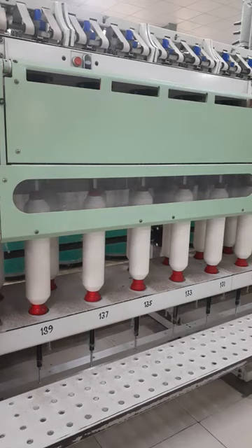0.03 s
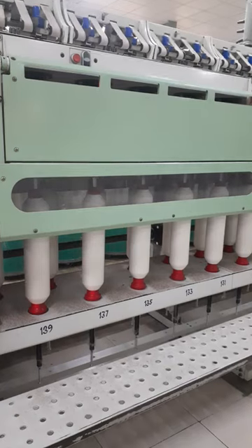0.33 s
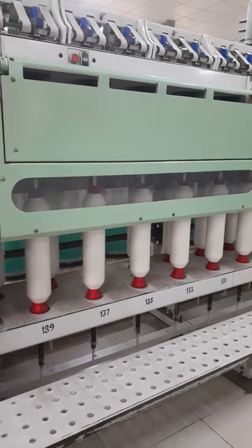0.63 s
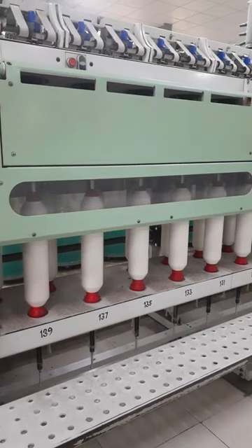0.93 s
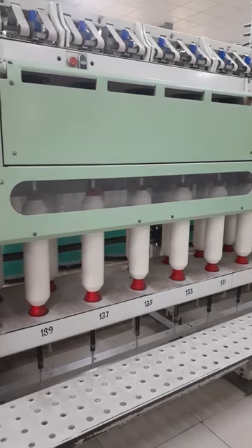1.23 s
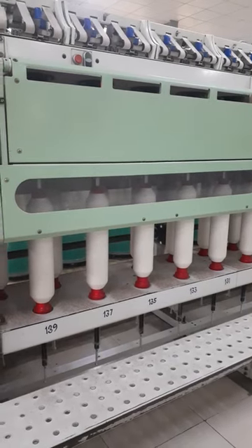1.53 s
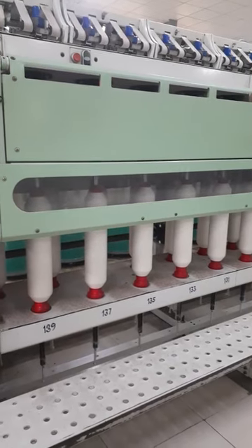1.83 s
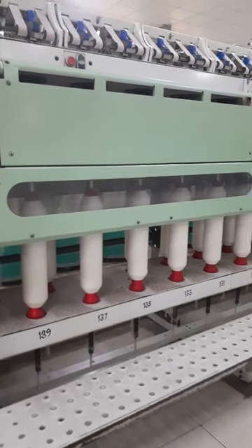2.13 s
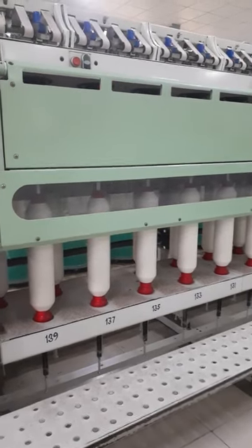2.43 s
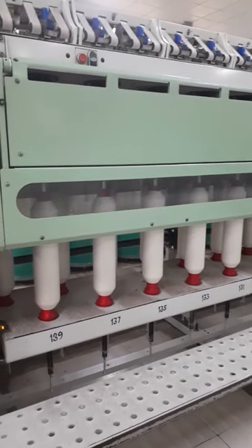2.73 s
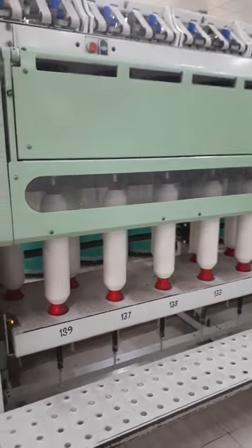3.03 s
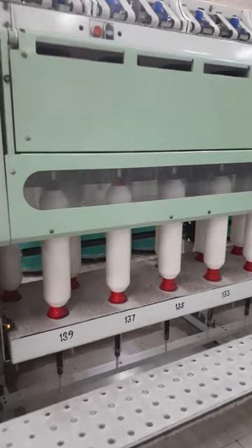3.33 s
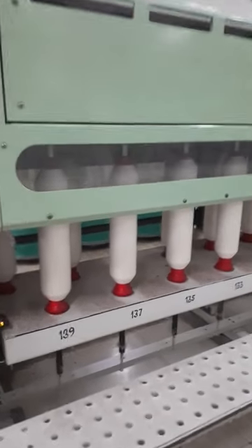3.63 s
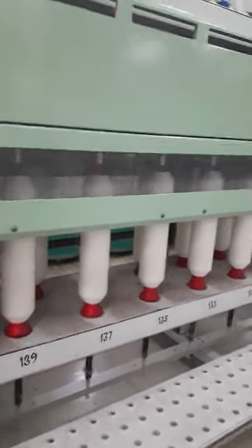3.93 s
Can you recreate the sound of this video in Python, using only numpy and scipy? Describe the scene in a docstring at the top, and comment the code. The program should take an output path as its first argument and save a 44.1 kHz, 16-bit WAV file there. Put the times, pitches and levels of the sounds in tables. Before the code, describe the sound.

A yarn spinning machine runs steadily in a large factory hall. Its spindles make a throbbing hum with a motor whine, while whirling yarn hisses close to the microphone and other machines roar farther off.

```python
"""A ring spinning frame running in a large factory hall, heard in stereo from the aisle.
Banks of spindles at slightly different speeds beat into a throbbing hum; the drives add steady tones.
Farther off, the other frames merge into the roar of the hall. Close to the microphone, whirling yarn
rushes and the travellers hiss unevenly round their rings."""
import sys
import numpy as np
from scipy import signal
from scipy.fft import rfft, irfft
from scipy.io import wavfile
from scipy.ndimage import uniform_filter1d

SR = 44100
rng = np.random.default_rng(int(sys.argv[2]) if len(sys.argv) > 2 else 0)


def bounce(signal):
    """Save signal as a 16-bit WAV file at the path given by the first command-line argument."""
    frames = np.transpose(np.atleast_2d(signal))
    limited = np.clip(frames, -1, 1)
    pcm = np.round(limited * 32767).astype(np.int16)
    wavfile.write(sys.argv[1], SR, pcm)


N = 176400
TIME, FREQ = np.arange(N) / SR, np.fft.rfftfreq(N, 1 / SR)
FLUTTER_HZ = 28  # how fast the roar, rush and hiss flicker


def undb(db):
    """Decibels to gain."""
    return 10 ** (np.asarray(db) / 20)


def curve(rows):
    """Gain over time through points of t/s, level/dB."""
    return undb(np.interp(TIME, *np.array(rows).T))


def walk(rate_hz):
    """Smooth random drift with a spread near 1."""
    hold = max(int(SR / rate_hz), 2)
    steps = np.repeat(rng.standard_normal(N // hold + 2), hold)
    return 1.3 * uniform_filter1d(uniform_filter1d(steps, hold), hold)[:N]


def pan(db):
    """Left and right gains for a level difference, left minus right."""
    return undb(np.array([[db], [-db]]) / 2)


def colour(white, hz, db):
    """Shape white noise to a spectrum in dB per Hz."""
    gain = undb(np.interp(np.log(np.maximum(FREQ, 1)), np.log(hz), db))
    return irfft(rfft(white) * gain, N) * np.sqrt(SR / 2)


def tone(hz, sway_db):
    """A wavering tone, a little to the right, that reaches the two channels by different paths."""
    spread_rad_per_khz = 1.87
    phase = 2 * np.pi * (np.cumsum(hz) / SR + rng.random())
    phase_gap = spread_rad_per_khz * np.mean(hz) / 1000 * walk(2.006)
    sway = undb(sway_db * walk(5.07))
    return np.sqrt(2) * sway * np.sin(phase + np.array([phase_gap, -phase_gap]) / 2) * pan(db=-2)


def bank(rows, level):
    """Unbalanced spindles hum at their turning rates and beat against each other."""
    # harmonics of every spindle: multiple, level/dB
    overtones = [(1, -.5), (2, -16), (3, -23.5), (4, -20), (5, -17.5)]
    slip_hz, hum = 0.805, 0
    for hz, db in rows:
        turning_hz = hz + slip_hz * walk(5)
        for multiple, overtone_db in overtones:
            hum += undb(db + overtone_db) * tone(multiple * turning_hz, sway_db=1)
    return hum * curve(level)


def spindles():
    """Three banks swell and fade in turn, so the throb changes its pace."""
    # turning rates of the spindles in each bank: f/Hz, level/dB
    slow = [(240.3, -36.5), (248.5, -32), (256.1, -33), (258.6, -32.5)]
    middle = [(273, -34), (275.4, -24.7)]
    fast = [(287.2, -32), (289.5, -35)]
    # rise and fall of each bank: t/s, level/dB
    slow_level = [(.2, 3.5), (.38, 0), (.52, 1), (.75, 2), (1.1, -0.5), (1.55, 0.5), (1.65, -9), (1.78, -1),
                  (2.0, -5), (2.07, -8), (2.16, -9), (2.22, 1), (2.48, -2), (2.7, 3), (3.1, 1.5), (3.3, 0),
                  (3.5, -8), (3.68, 0.5), (4, -3)]
    middle_level = [(.2, 3), (.35, -10), (.52, -0.5), (.72, -5), (.9, 1.5), (1.08, -2), (1.28, 2.5),
                    (1.4, -3), (1.55, 2), (1.65, -12), (1.8, -3), (1.98, -4.5), (2.08, -12), (2.17, -11),
                    (2.26, -0.5), (2.45, -2.5), (2.62, 2), (2.78, -1), (2.95, 0), (3.08, -1.5), (3.33, 6.5),
                    (3.5, -5.5), (3.7, 4.5), (4, -3.5)]
    fast_level = [(.2, -2), (.6, 1.5), (1.2, 1), (1.95, -4.5), (2.1, -14), (2.25, 3.5), (2.7, 4), (3.1, -5),
                  (3.5, -1), (4, -1)]
    return bank(slow, slow_level) + bank(middle, middle_level) + bank(fast, fast_level)


def drives():
    """Motor, belts and gears sing at nearly fixed pitches; the strongest whine slowly recedes."""
    # tones of motor, belts and gears: f/Hz, level/dB
    tones = [(48.2, -49), (146.5, -42.5), (442.7, -43), (515, -45), (547, -39.5), (590.3, -37.5),
             (660.7, -39), (768, -47.5), (819, -44), (1092, -40.5), (1211, -44.5), (1292, -44), (1322, -46),
             (1364, -45)]
    # rise and fall of those tones, and of the whine: t/s, level/dB
    tones_level = [(.15, 3.5), (.45, 4), (1.05, 2), (1.8, -1.5), (2.1, -2), (2.8, 0.5), (3.25, -2),
                   (3.5, -1), (4, -3.5)]
    whine_level = [(.15, -28.5), (.7, -28), (1.3, -31.5), (2.2, -33.5), (2.8, -29), (3.2, -35.5), (4, -37)]
    whine_hz, pitch_drift = 386, 0.001636
    sing = lambda hz: tone(hz * (1 + pitch_drift * walk(3.95)), sway_db=2.5)
    chord = sum(undb(db) * sing(hz) for hz, db in tones)
    return chord * curve(tones_level) + sing(whine_hz) * curve(whine_level)


def hall():
    """Distant frames merge into a reverberant roar, alike in both channels only in the bass."""
    # spectrum of the roar: f/Hz, level/dB per Hz
    spectrum = [(20, -96), (40, -84), (56, -59), (70, -54), (105, -55), (148, -47.5), (180, -51.5),
                (230, -47), (275, -47), (310, -53.5), (400, -52), (520, -52.5), (700, -54), (930, -56),
                (1150, -52.5), (1400, -55.5), (1700, -56.5), (2300, -60.5), (4000, -71), (8000, -93)]
    # rise and fall of the roar: t/s, level/dB
    level = [(.15, 2.5), (.8, 1.5), (.9, 1), (1.15, 2.5), (1.24, -1), (1.43, 2.5), (1.51, -3.5),
             (1.62, -1.5), (1.7, -.5), (2.0, -0.5), (2.1, -3), (2.25, -1), (3.1, -1), (3.7, 0.1), (4, 1.3)]
    diffuse_hz, flutter_db = 915, 0.72
    coherence = np.clip(1.01 * np.exp(-(FREQ / diffuse_hz) ** 2), 0, 1)
    mid = irfft(rfft(rng.standard_normal(N)) * np.sqrt((1 + coherence) / 2), N)
    side = irfft(rfft(rng.standard_normal(N)) * np.sqrt((1 - coherence) / 2), N)
    roar = colour(np.array([mid + side, mid - side]), *np.array(spectrum).T)
    return roar * pan(db=-3) * curve(level) * undb(flutter_db * walk(FLUTTER_HZ))


def friction(spectrum, flutter_db):
    """Many sliding contacts make a grainy, fluttering noise, separate in each channel."""
    grain_hz, grain_db = 1300, 0.62
    hz, *channels = np.array(spectrum).T
    flutter = undb(flutter_db * walk(FLUTTER_HZ) + grain_db * walk(grain_hz))
    return np.array([colour(rng.standard_normal(N) * flutter, hz, db) for db in channels])


def yarn():
    """Whirling yarn rushes close to the microphone."""
    # spectrum of the rush: f/Hz, left level/dB per Hz, right level/dB per Hz
    spectrum = [(1190, -82, -84), (2180, -63, -63.5), (3120, -62.5, -57.5), (4030, -64.5, -60.5),
                (5740, -66.5, -60), (6860, -67.5, -62.5), (7970, -66.5, -68), (10000, -71.5, -68)]
    # rise and fall of the rush: t/s, level/dB
    level = [(.15, 1.5), (.28, 1.5), (.5, 1), (.64, 2.4), (.88, 0.5), (1.0, 2.5), (1.2, 0.3), (1.43, 3),
             (1.6, -2), (1.72, -0.7), (2.1, -1.3), (2.4, -0.3), (2.65, -1.9), (2.8, 0), (3.03, -2.5),
             (3.5, 1), (3.7, -1), (4, 0.5)]
    return friction(spectrum, flutter_db=0.92) * curve(level)


def travellers():
    """Close by, travellers slide round their rings with an uneven hiss that wanders from side to side."""
    # spectrum of the hiss: f/Hz, left level/dB per Hz, right level/dB per Hz
    spectrum = [(5000, -76, -75), (8000, -72.5, -73), (8460, -64, -67.5), (10100, -65.5, -61),
                (11140, -60.5, -58.5), (12400, -63.5, -57), (13300, -65, -58.5), (14100, -61, -58.5),
                (15500, -66, -62.5)]
    # rise and fall of the hiss: t/s, level/dB
    level = [(.15, -2), (.28, 0), (.39, -2), (.53, -6.5), (.57, 1.8), (.7, 2), (.76, 0.5), (1.0, 1.7),
             (1.1, -4), (1.25, 2.3), (1.37, -.5), (1.44, 4), (1.65, 1.5), (1.8, 0.5), (1.87, 3), (1.97, -2),
             (2.06, 4), (2.13, 1.5), (2.18, 1.5), (2.27, -0.8), (2.44, -3), (2.52, 0), (2.73, -1.5),
             (2.8, 1.5), (2.87, -2.5), (2.98, -0.5), (3.05, -2.5), (3.35, 1.5), (3.7, -1), (3.8, -2.8),
             (4, -.7)]
    # place in the stereo image: t/s, left minus right/dB
    balance = [(.15, -1), (.45, 1.5), (.65, 1), (1.0, -0.5), (1.35, 0.5), (1.6, -2.5), (1.75, 0),
               (2.1, -0.5), (2.45, 0.5), (2.9, -1), (3.35, -1.5), (3.8, -1)]
    lean = np.sqrt(curve(balance))
    return friction(spectrum, flutter_db=1) * curve(level) * np.array([lean, 1 / lean])


def arch(middle_s, length_s):
    """A half-cosine envelope that rises from silence and returns to it."""
    return np.cos(np.pi * np.clip((TIME - middle_s) / length_s, -.5, .5))


def throbs():
    """Short pulses at the pitch of the hum: the firm beats where the spindles push together."""
    # peaks of the firmest beats: t/s, level/dB
    beats = [(.228, -17), (.507, -14.5), (.63, -18), (.855, -19), (.997, -16.5), (1.738, -18),
             (1.85, -17.5), (1.975, -20), (2.595, -18), (2.955, -18), (3.66, -18)]
    hum_hz = 268.2
    pulses = sum(undb(db) * arch(at, length_s=0.0454) for at, db in beats)
    return pulses * tone(np.full(N, hum_hz), sway_db=0)


def swells():
    """Narrow bands of noise swell and die away; two of them slide down in pitch."""
    # bands: middle t/s, length/s, f/Hz, glide/(Hz per s), width/Hz, level/dB, left minus right/dB
    bands = [(.66, 0.18, 5800, 0, 1800, -35, 7), (.8, .1, 4500, 0, 600, -40, 8),
             (1.32, .12, 4900, 0, 900, -36, 8), (1.45, .1, 4900, 0, 900, -38, 8),
             (2.798, .1, 5170, 0, 500, -39, 9), (2.95, .16, 13500, 0, 2200, -31, -4),
             (3.299, 0.7, 12650, -600, 700, -32, -7), (3.51, .2, 11800, -4000, 700, -36, -7),
             (3.52, .13, 6000, 0, 2200, -34, 8), (3.697, 0.19, 660, 0, 100, -27.5, -2)]
    out = 0
    for middle, length, hz, glide, width, db, pan_db in bands:
        bell = np.exp(-2 * ((FREQ - hz) / width) ** 2)
        band = irfft(rfft(rng.standard_normal(N)) * bell, N)
        chirp = np.exp(1j * np.pi * glide * (TIME - middle) ** 2)
        sliding = np.real(signal.hilbert(band / band.std()) * chirp)
        out += sliding * arch(middle, length) * undb(db) * pan(pan_db)
    return out


def scene():
    """From the aisle: yarn and travellers up close, hum and drive tones over the hall behind."""
    close = yarn() + travellers()
    return close + spindles() + throbs() + drives() + hall() + swells()


def record(dry):
    """The sound cuts in after a moment of silence; a steep low-pass takes off the very top."""
    start_s, fade_s, top_hz = 0.1139, 0.0027, 15550
    opening = np.clip((TIME - start_s) / fade_s, 0, 1)
    low_pass = signal.ellip(12, .1, 80, top_hz, fs=SR, output="sos")
    return signal.sosfilt(low_pass, dry * opening)


dry = scene()
out = record(dry)
bounce(out)
```